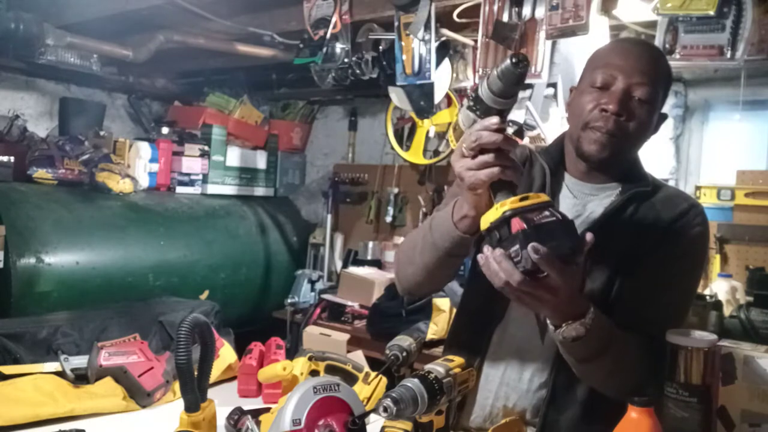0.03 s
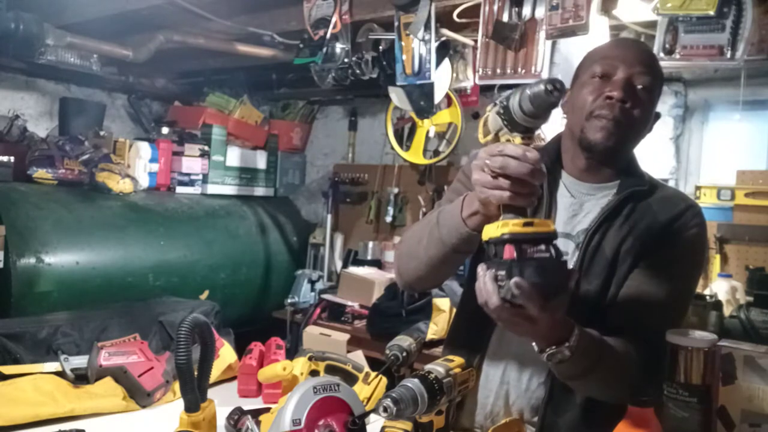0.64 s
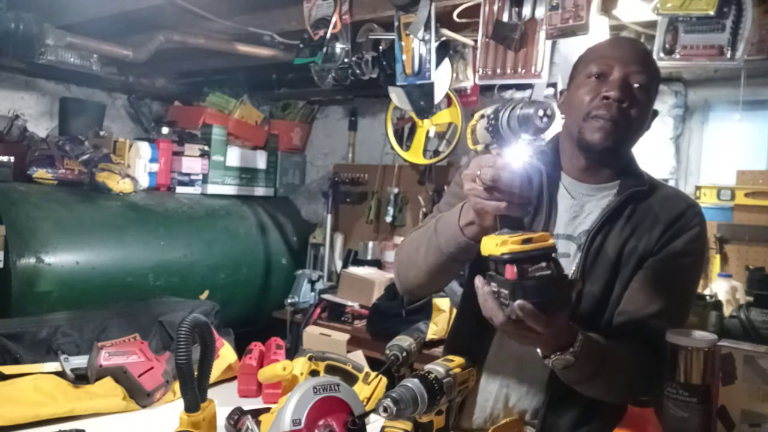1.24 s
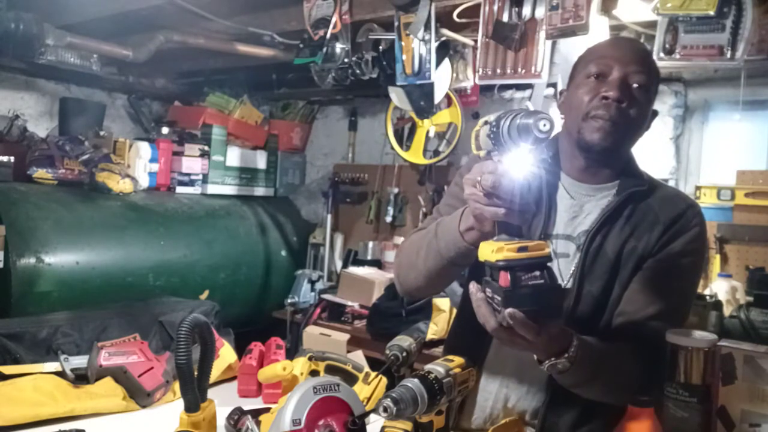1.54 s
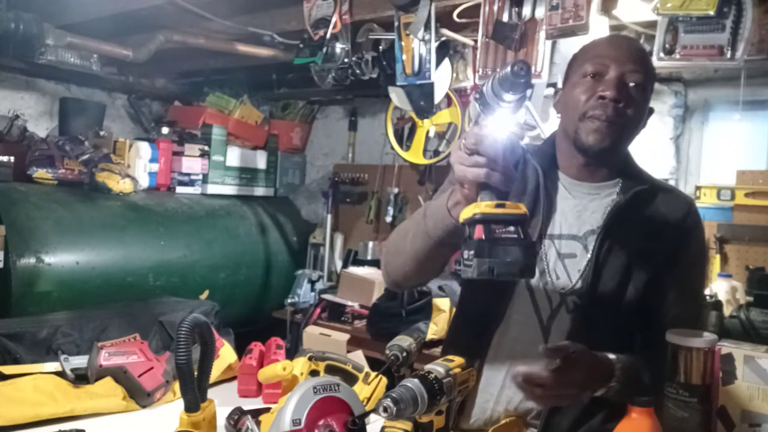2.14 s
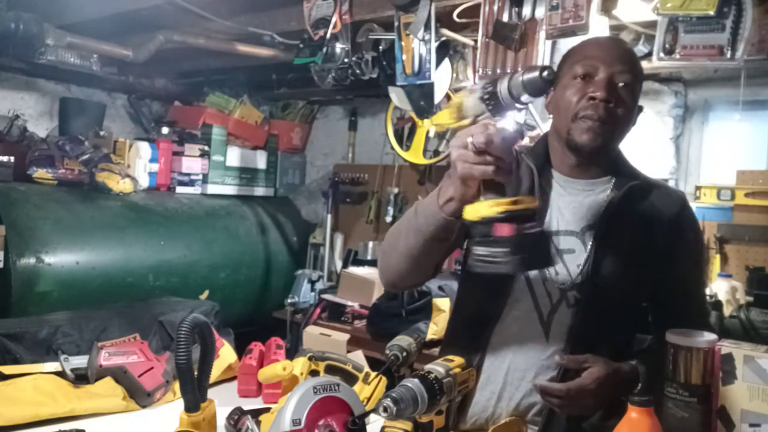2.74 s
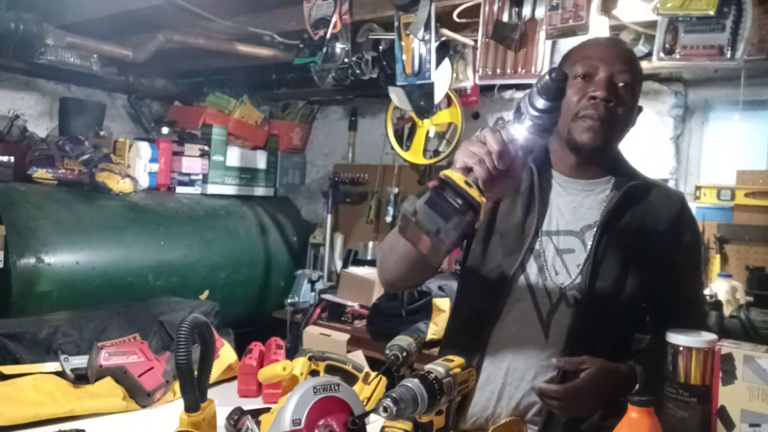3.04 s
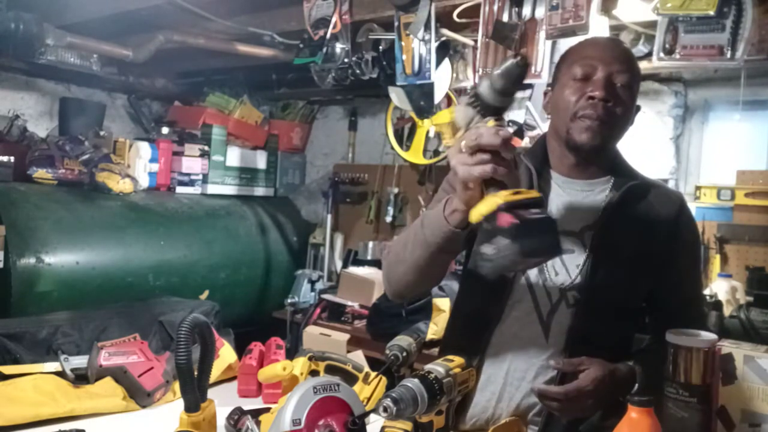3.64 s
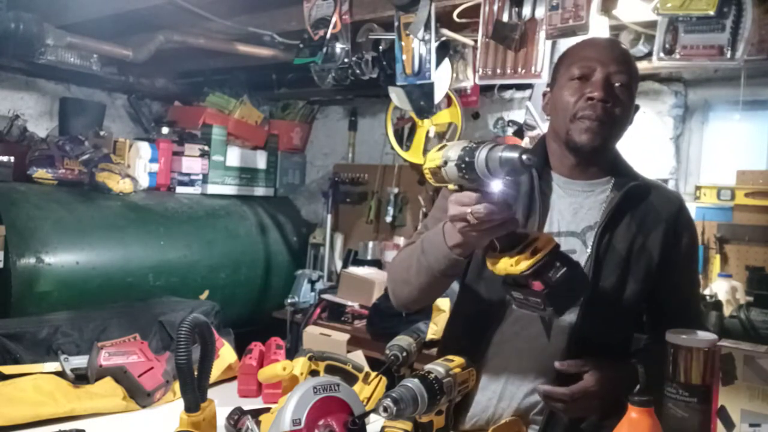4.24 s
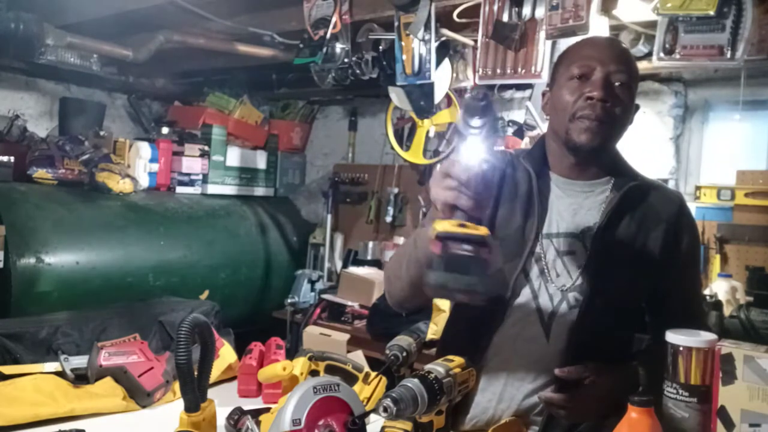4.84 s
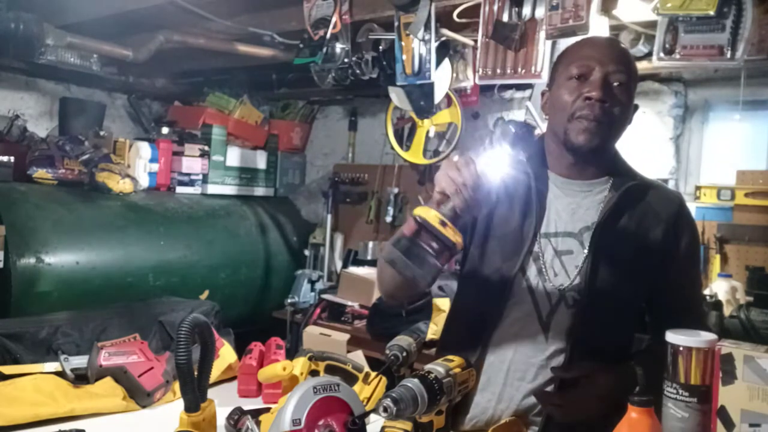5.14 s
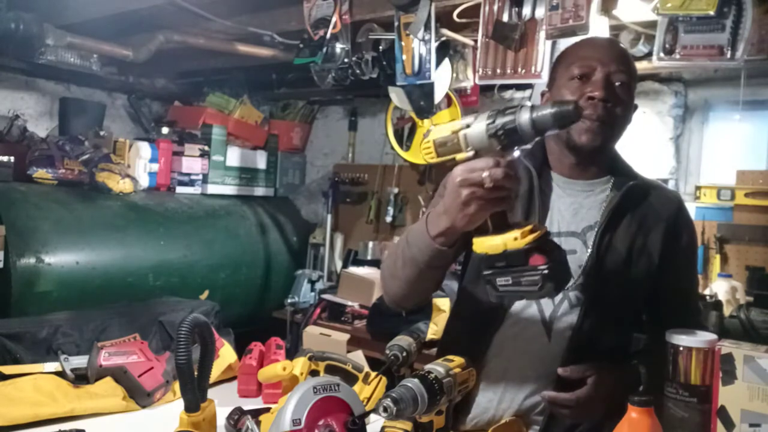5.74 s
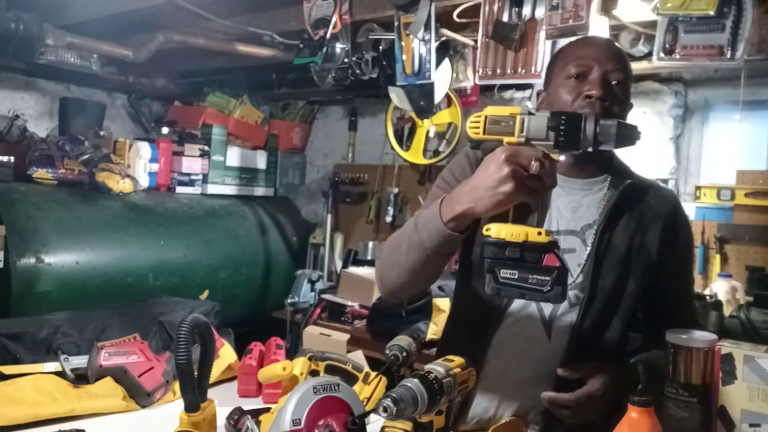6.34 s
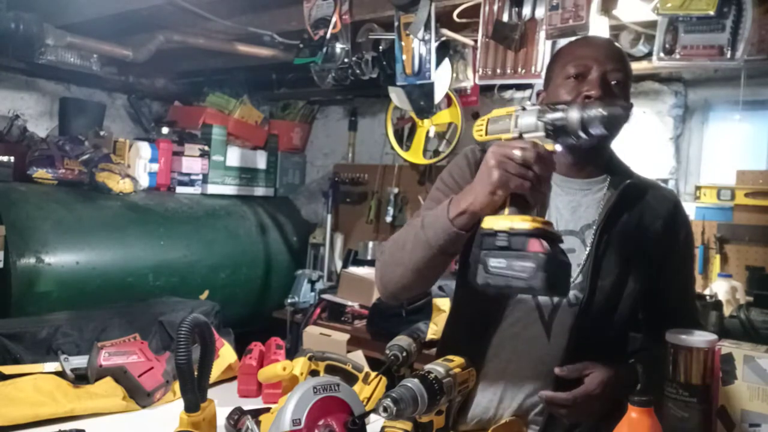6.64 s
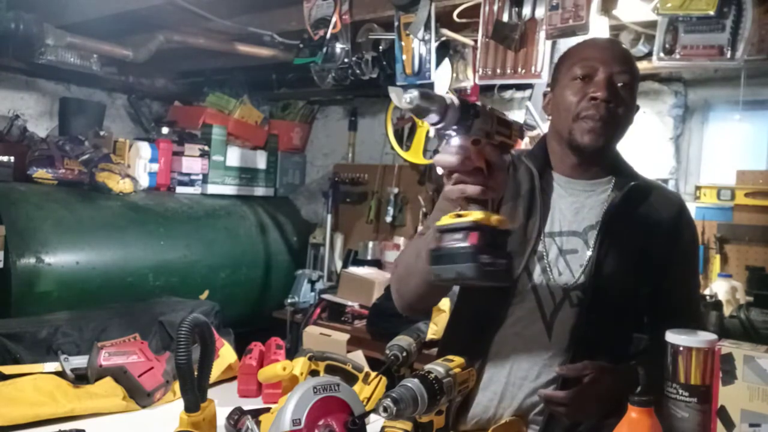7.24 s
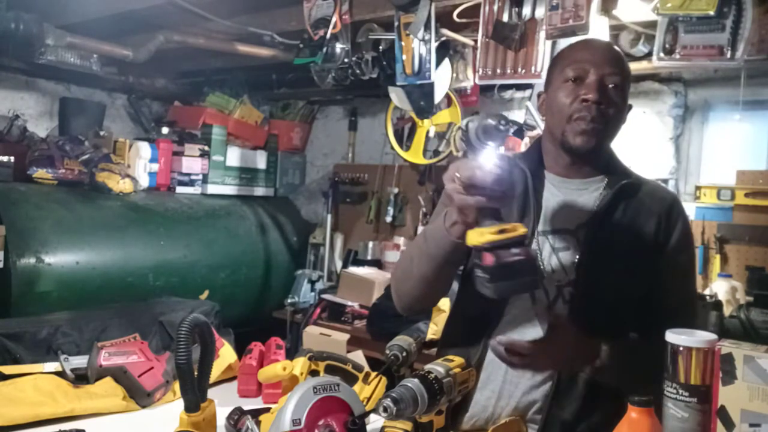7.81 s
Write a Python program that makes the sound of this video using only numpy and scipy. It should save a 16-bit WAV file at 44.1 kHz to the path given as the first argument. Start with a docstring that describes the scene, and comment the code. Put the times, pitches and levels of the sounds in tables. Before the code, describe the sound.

A cordless drill whines with no load in one short blip and two longer runs, clacking at each start and stop.

```python
"""A cordless drill runs without load in a small, cluttered workshop, two metres away. Over still air and
a faint rumble, chuck lock and switches clack and a hand slides on the grip. At one second the trigger is
blipped: the motor whines on multiples of its shaft speed and gear teeth rattle in the housing. Two long
runs follow, the whine swelling and fading as the drill is turned. The chuck clacks whenever it takes up
its play or is braked. The last run is let down slowly and stops with a clack at eight seconds."""
import sys
import numpy as np
from scipy import signal
from scipy.fft import rfft, irfft
from scipy.io import wavfile
from scipy.ndimage import uniform_filter1d

SR = 44100
rng = np.random.default_rng(int(sys.argv[2]) if len(sys.argv) > 2 else 0)


def bounce(signal):
    """Save signal as a 16-bit WAV file at the path given by the first command-line argument."""
    frames = np.transpose(np.atleast_2d(signal))
    limited = np.clip(frames, -1, 1)
    pcm = np.round(limited * 32767).astype(np.int16)
    wavfile.write(sys.argv[1], SR, pcm)


N = 356019
FULL_HZ = 360  # shaft turns per second at full speed


def undb(db):
    """Decibels to gain."""
    return 10 ** (np.asarray(db) / 20)


def unit(x):
    """Scale to rms 1."""
    return x / np.sqrt(np.mean(x ** 2))


def curve(table):
    """Join (seconds, value) points with straight lines."""
    seconds, values = np.transpose(table)
    return np.interp(np.arange(N) / SR, seconds, values)


def walk(rate):
    """Smooth random drift that changes about rate times a second; rms 1."""
    hold = max(int(SR / rate), 2)
    steps = np.repeat(rng.standard_normal(N // hold + 1), hold)
    return unit(uniform_filter1d(steps, hold)[:N])


def through(x, response):
    """Pass a sound through an impulse response."""
    return signal.fftconvolve(x, response)[:N]


def body(points, modes=(), size=2048):
    """Causal response of unit energy from a (Hz, dB) outline with resonances on top."""
    f = np.maximum(np.fft.rfftfreq(size, 1 / SR), 1)
    hz, db = np.transpose(points)
    outline = undb(np.interp(np.log(f), np.log(hz), db))
    peaks = sum(undb(d) / (1 + (2 * (f - centre) / width) ** 2) for centre, width, d in modes)
    cepstrum = irfft(np.log(outline * (1 + peaks)))
    cepstrum[1:size // 2] *= 2  # fold to minimum phase
    cepstrum[size // 2 + 1:] = 0
    response = irfft(np.exp(rfft(cepstrum)))
    return response / np.sqrt(np.sum(response ** 2))


def partials(turns, orders, flutter_db):
    """Tones locked to the shaft angle, each fluttering on its own."""
    return sum(np.sqrt(2) * undb(db + flutter_db * walk(35))
               * np.sin(2 * np.pi * (order * turns + rng.random())) for order, db in orders)


# Tone colours of the still air and the building's rumble. Each row: frequency in Hz, relative level in dB.
AIR_COLOUR = [(25, -17), (65, -10), (130, -1), (300, -8), (650, -6), (1100, -16.5), (1650, -11),
              (3000, -19.5), (6800, -16.5), (7800, -30.5), (10000, -18), (15500, -23)]
RUMBLE_COLOUR = [(25, -14.5), (45, -9), (65, 3), (90, -11), (200, -28.5), (600, -62)]
# The rumble's fader ride. Each row: time in seconds, level in dB.
RUMBLE_LEVEL = [(0, -75), (1.1, -75.5), (1.7, -91), (2.8, -91), (4.1, -73), (4.8, -89), (5.8, -92),
                (6.4, -72), (7.2, -65), (8, -74)]

def room_tone(air_db=-71, air_swell_db=2.0, rumble_swell_db=3):
    """A bed of quiet air, with a faint rumble in the building that comes and goes."""
    rumble_db = curve(RUMBLE_LEVEL) + rumble_swell_db * walk(3.7)
    air = undb(air_db + air_swell_db * walk(2.8)) * through(rng.standard_normal(N), body(AIR_COLOUR))
    return air + undb(rumble_db) * through(rng.standard_normal(N), body(RUMBLE_COLOUR, size=8192))


# Hits of chuck lock, trigger and switches. Each row: start in seconds, relative level in dB,
# low knock and bright edge in dB against that level, chatter decay in seconds.
CLACKS = [(0.001, -32, -5, -11, 0.016), (0.016, -29, 11.5, -8, 0.0032), (0.045, -34.5, -26, -8, 0.016),
          (0.079, -25, -0.5, -13, 0.0043), (0.127, -47, 3, -4, 0.0032), (0.3154, -28, -4, -14, 0.0025),
          (0.324, -31, -4, -8, 0.0048), (0.3335, -6.5, -14, -4, 0.0022), (0.341, -20, -8.5, -12, 0.01),
          (0.467, -50, 0, -14, 0.0039), (0.554, -47, -16, -10, .003), (0.575, -58.5, 13.5, -13, 0.0059),
          (0.963, -34, -3.5, -2, 0.014), (0.981, -10, -19, -5, 0.0045), (1.017, -13, -13.5, -2.5, 0.0083),
          (1.17, -9, -24.5, -2.5, 0.0044), (1.189, -16, -21, -6, 0.013), (1.343, -25.5, -4.5, -2.5, 0.0066),
          (1.368, -16, -22, 0.5, 0.0047), (1.385, -12, -17, -3, 0.0054), (3.741, -19.5, -9, 6.5, 0.0031),
          (3.759, -32, 1.5, 10, 0.013), (3.8, -41, -14, -8, .004), (3.892, -46, -29, -2, 0.0059),
          (4.000, -55, -4, -2.5, 0.0038), (4.063, -23.5, -9, -6, .004), (4.088, -12.5, -21.5, -3.5, 0.0063),
          (4.116, -21, -7.5, -4, 0.021), (7.980, -14, -15, -6, 0.005), (7.990, -31, 1.5, -15, 0.027)]
# The three layers of a hit. Each row: frequency in Hz, relative level in dB.
KNOCK_COLOUR = [(100, -31.5), (200, -23.5), (280, -6.5), (450, -6.5), (640, 2), (850, 0.5), (1100, 0),
                (1800, 5), (5000, -46.5)]
CLACK_COLOUR = [(300, -38.5), (900, -13.5), (1550, -7.5), (2200, -3), (3300, 1), (4100, -1), (5000, 0),
                (7000, 2.5), (8000, -12), (15000, -29)]
EDGE_COLOUR = [(3000, -47), (7000, -16), (8500, 1), (10000, -4.5), (12000, -6), (16000, -6.5)]
# Ring of the plastic shell and battery. Each row: frequency in Hz, width in Hz, strength in dB.
SHELL_MODES = [(463, 25, 8), (628, 25, 6.5), (875, 50, 3), (1080, 35, 2.5)]

def clacks(gain_db=2):
    """Each hit is a burst of chatter that sounds the plastic shell, the steel chuck and its edges."""
    t = np.arange(N) / SR
    forces = np.zeros((3, N))
    for start_s, db, knock_db, edge_db, decay_s in CLACKS:
        start = int(start_s * SR)
        span = min(SR // 4, N - start)
        gains = undb(db + np.array([[knock_db], [0], [edge_db]]))
        forces[:, start:start + span] += gains * np.exp(-t[:span] / decay_s)
    voices = body(KNOCK_COLOUR, SHELL_MODES), body(CLACK_COLOUR), body(EDGE_COLOUR)
    layers = (through(force * rng.standard_normal(N), voice) for force, voice in zip(forces, voices))
    return undb(gain_db) * sum(layers)


def workshop(dry, t60_low=0.16, t60_high=0.15, wet_db=0, changes=130):
    """Direct sound plus scatter from shelves and a low ceiling, shifting as the drill is waved about."""
    t = np.arange(SR // 3) / SR
    hop = N // changes + 1
    fade = np.sin(np.pi * (np.arange(2 * hop) + .5) / (2 * hop))
    padded = np.pad(dry, (hop, 3 * hop))
    wet = np.zeros(len(padded) + len(t))
    low, high = (signal.butter(2, 7000, kind, fs=SR, output="sos") for kind in ("low", "high"))
    for start in range(0, N + hop, hop):
        tail = sum(signal.sosfilt(sos, rng.standard_normal(len(t))) * np.exp(-np.log(1000) * t / t60)
                   for sos, t60 in ((low, t60_low), (high, t60_high)))
        tail /= np.sqrt(np.sum(tail ** 2))
        scatter = signal.fftconvolve(padded[start:start + 2 * hop] * fade, tail)
        wet[start:start + len(scatter)] += scatter
    return (dry + undb(wet_db) * wet[hop:hop + N]) / np.hypot(1, undb(wet_db))


# Hand and sleeve moves on the grip. Each row: middle in seconds, half length in seconds, level in dB.
RUBS = [(0.532, .035, -59), (0.626, 0.042, -52), (0.827, 0.027, -64), (0.93, 0.018, -67)]
# Tone colour of the rubbing. Each row: frequency in Hz, relative level in dB.
RUB_COLOUR = [(200, -13), (700, 0), (1100, -10), (1900, 6), (3800, 0), (6800, 6), (8200, 0), (15500, -1)]

def grip(grain_db=3):
    """Skin and cloth slide over the handle in small uneven slips."""
    t = np.arange(N) / SR
    slide = sum(undb(db) * np.exp(-((t - middle) / half) ** 2) for middle, half, db in RUBS)
    slips = unit(rng.standard_normal(N) * undb(grain_db * walk(220)))
    return through(slips * slide, body(RUB_COLOUR))


# Trigger cues. Each row: when the motor starts, the gears engage and the brake bites, then spin-up time
# and braking time, all in seconds, and last the relative force on the gears in dB.
PULLS = [(0.966, 1.013, 1.169, 0.089, .05, -20.5), (1.340, 1.379, 3.740, 0.1, .075, -20.1),
         (4.054, 4.085, 7.980, .255, .075, -20)]
# Shaft speed the finger asks for in each pull. Each row: time in seconds, turns per second.
BLIP_SPEED = [(1.05, 215), (1.15, 258)]
FIRST_RUN_SPEED = [(1.5, 347), (1.64, 358.5), (1.8, 362.7), (2.06, 362.5), (2.29, 338.5), (2.46, 358),
                   (2.88, 362), (3.08, 341.5), (3.5, 331)]
LAST_RUN_SPEED = [(4.4, 363), (5.3, 359.2), (5.8, 359.7), (6.05, 337.5), (6.35, 330.8), (6.83, 330.2),
                  (6.95, 341), (7.28, 272), (7.5, 248.5), (7.95, 163)]

def motor(knee=5, coast_s=0.022, coast_db=-15):
    """Each pull spins the shaft up and the brake stops it; returns speed and the force on the gears."""
    t = np.arange(N) / SR
    hz, load = np.zeros(N), np.zeros(N)
    speeds = BLIP_SPEED, FIRST_RUN_SPEED, LAST_RUN_SPEED
    for (start, engage, brake, rise_s, brake_s, db), asked in zip(PULLS, speeds):
        ramp = np.clip((t - start) / rise_s, 0, 20)
        spin_up = ramp / (1 + ramp ** knee) ** (1 / knee)
        braking = np.clip(1 - (t - brake) / brake_s, 0, 1)
        hz += curve(asked) * spin_up * braking
        coasting = (t > brake - coast_s) & (t < brake)  # unloaded between letting go and the brake
        load += undb(db + coast_db * coasting) * (t > engage) * (braking > 0)
    return hz, uniform_filter1d(load, size=200)


# Tone colour of the kick in the hand. Each row: frequency in Hz, relative level in dB.
KICK_COLOUR = [(25, -7), (65, 3), (120, -1), (220, -5), (500, -23), (2000, -59)]

def kick(hz, level_db=-63.5):
    """The drill kicks in the hand with a dull thud as the shaft is sped up or braked."""
    acceleration = np.abs(np.gradient(hz)) * SR / FULL_HZ / 10  # 1 is rest to full speed in 0.1 s
    torque = uniform_filter1d(acceleration, size=3000)
    return undb(level_db) * torque * through(rng.standard_normal(N), body(KICK_COLOUR, size=4096))


# Swells of the main whine as its beam swings past. Each row: time in seconds, relative level in dB.
FIRST_RUN_WHINE = [(1.64, -30.5), (1.8, -20.5), (2, -17), (2.16, -25.5), (2.23, -21.5), (2.37, -25.5),
                   (2.52, -16), (2.7, -30.5), (2.98, -23), (3.16, -29), (3.3, -20.5), (3.52, -29.5)]
LAST_RUN_WHINE = [(4.24, -32), (4.35, -24.5), (4.48, -17), (4.78, -23), (5.13, -26), (5.28, -18.5),
                  (5.5, -30), (5.6, -19), (5.8, -25), (6.24, -24), (6.5, -36), (6.86, -34.5), (6.95, -25),
                  (7.1, -34)]
# Three families of weaker tones. Each row: multiple of the shaft speed, relative level in dB.
LOW_ORDERS = [(3, -58), (5, -64), (7, -35.5)]
UPPER_ORDERS = [(21, -36.5), (28, -47), (42, -53)]
GEAR_ORDERS = [(17, -36.5), (19, -50), (34, -50)]
# Each family beams in its own direction. Each row: time in seconds, gain in dB.
LOW_BEAM = [(1.62, 2.5), (1.8, -14), (2.15, 4), (2.6, 3.5), (2.9, -2.5), (4.35, -3), (4.55, 5), (5.05, 1.5),
            (5.65, -5), (6.6, 4), (6.85, -6), (7.25, 2.5), (7.8, 1.5)]
UPPER_BEAM = [(1.5, 6.5), (2.05, -10), (2.27, 5), (2.7, -13), (3.3, 12), (3.7, 4), (4.3, 0), (4.5, 10),
              (4.75, -5), (5.5, 4.5), (6.4, 8.5), (6.62, 18), (6.85, 1), (7.2, 4), (7.5, 10.5)]
GEAR_BEAM = [(1.5, -12), (1.85, 11.5), (2.25, 1), (2.48, 6), (2.8, -11), (3.1, 6), (4.3, -3), (4.55, 7),
             (5, -3), (6.5, -2), (7.17, 6), (7.4, 3)]

def whine(angle, octaves, main_order=14, db_per_octave=8):
    """Motor and gear tones grow with speed; they beam, so they swell and fade as the drill is turned."""
    main_beam = undb(curve(FIRST_RUN_WHINE + LAST_RUN_WHINE))
    main = main_beam * partials(angle, [(main_order, 0)], flutter_db=2.0)
    families = (LOW_BEAM, LOW_ORDERS), (UPPER_BEAM, UPPER_ORDERS), (GEAR_BEAM, GEAR_ORDERS)
    others = sum(undb(curve(beam)) * partials(angle, orders, flutter_db=1.76)
                 for beam, orders in families)
    return undb(db_per_octave * octaves) * (main + others)


# The rotor hum's fader ride. Each row: time in seconds, relative level in dB.
HUM_LEVEL = [(1.6, -63), (1.85, -57.5), (2.35, -55), (2.55, -79), (2.9, -69), (3.25, -54), (4.95, -56.5),
             (5.24, -83), (5.47, -62), (5.85, -67), (6.2, -55.5), (7.1, -56.5), (7.4, -64)]

def rotor_hum(angle, octaves, db_per_octave=22):
    """The rotor's unbalance hums at the shaft speed and falls away steeply as it slows."""
    level = undb(curve(HUM_LEVEL) + db_per_octave * octaves)
    return level * partials(angle, [(1, 0.0064)], flutter_db=2.3)


# Tone colour radiated by the gearbox and its shell. Each row: frequency in Hz, relative level in dB.
HOUSING_COLOUR = [(120, -59), (250, -42.5), (420, -21.5), (560, -19), (730, -11), (1050, -10), (1550, -3.5),
                  (2250, -0.5), (3300, -2), (5200, 1.5), (7200, 0.5), (7800, -6.5), (11500, -9.5),
                  (15500, -8.5)]
# Ring of the metal gear case. Each row: frequency in Hz, width in Hz, strength in dB.
CASE_MODES = [(1643, 70, -6), (2837, 230, -0.5), (6240, 200, -13), (9850, 1000, 6.5)]

def gear_rattle(turns, hz, scatter_db=5.5, hiss_db=-5, wobble_db=2, slow_hz=230, unrest_db=1.0,
                wear_share=.3, teeth_per_turn=14, teeth_per_chuck_turn=147):
    """Loose teeth strike the case with uneven force and timing; brushes and fan add a hiss."""
    teeth = np.arange(int(turns[-1] * teeth_per_turn))
    # part of the unevenness is wear, which comes round again with each turn of the chuck
    wear = rng.standard_normal((teeth_per_chuck_turn, 3))[teeth % teeth_per_chuck_turn]
    chance = rng.standard_normal((len(teeth), 3))
    timing, side, strength = (np.sqrt(wear_share) * wear + np.sqrt(1 - wear_share) * chance).T
    at = np.searchsorted(turns, (teeth + .3 * timing) / teeth_per_turn).clip(0, N - 1)
    strikes = np.bincount(at, np.sign(side) * undb(scatter_db * np.minimum(strength, 2)), N)
    strikes = unit(strikes / np.sqrt(np.maximum(hz, 100)))
    force = unit(strikes + undb(hiss_db) * rng.standard_normal(N))
    # the planet carrier turns once in about five shaft turns and loads the teeth unevenly, most when slow
    carrier = np.sin(2 * np.pi * (turns / 4.7 + 0.17 * walk(25)))
    depth = np.minimum(slow_hz / np.maximum(hz, 1), 1) ** 2
    force *= undb(wobble_db * depth * carrier + unrest_db * walk(45))
    return through(force, body(HOUSING_COLOUR, CASE_MODES))


def brighten(rattle, octaves, treble_db=1.36, db_per_octave=2.5):
    """A treble shelf that opens up the rattle as the speed rises."""
    treble = signal.sosfilt(signal.butter(1, 7500, "high", fs=SR, output="sos"), rattle)
    return rattle + (undb(treble_db + db_per_octave * octaves) - 1) * treble


# The buzz inside the rattle. Each row: multiple of the shaft speed, relative level in dB.
BUZZ_ORDERS = [(2, -37), (4, -27.5), (5, -28), (15, -18), (18, -31), (20, -30), (22, -35), (27, -20),
               (35, -34)]

def buzz(angle, pace):
    """A stack of shaft harmonics, strongest at full speed."""
    return pace ** 2 * partials(angle, BUZZ_ORDERS, flutter_db=1.0)


# The low-speed growl of the gears. Each row: multiple of the shaft speed, relative level in dB.
GROWL_ORDERS = [(3, -25.5), (7, -15.5), (14, -4), (28, -4)]

def growl(angle, pace, slack):
    """Slack gears growl when the motor is throttled back and fall silent at full speed."""
    return slack * pace * partials(angle, GROWL_ORDERS, flutter_db=0.5)


def drill(hz, load, rattle_db_per_octave=4, backlash_db=2, slack_turns=0.022, shake_db=3,
          chuck_ratio=10.5, throb_db=1.0):
    """One shaft drives every running layer; returns the sound the room scatters and the direct tones."""
    pace = np.clip(hz / FULL_HZ, .01, 1)
    octaves, slack = np.log2(pace), 1 - pace ** 2
    turns = np.cumsum(np.maximum(hz, 1) * (1 + .001 * walk(40) + .002 * walk(400))) / SR
    force = load * undb(rattle_db_per_octave * octaves + backlash_db * slack)
    rattle = brighten(gear_rattle(turns, hz), octaves)
    # below full speed the gears float in their backlash and the tones turn raspy
    angle = turns + slack_turns * slack ** 2 * walk(250)
    shake = undb(shake_db * slack * walk(150))
    buzzing = force * buzz(angle, pace)
    gear_noise = force * (rattle + shake * growl(angle, pace, slack))
    # the load varies a little with each turn of the chuck
    throb = undb(throb_db * np.sin(2 * np.pi * turns / chuck_ratio))
    tones = (whine(angle, octaves) + rotor_hum(angle, octaves)) * shake * throb * load / load.max()
    return gear_noise, tones + buzzing


def scene():
    """Drill and hand in the room; both channels are alike."""
    hz, load = motor()
    gear_noise, tones = drill(hz, load)
    mono = workshop(gear_noise + clacks() + grip()) + tones + room_tone() + kick(hz)
    return np.array([mono, mono])


def record(dry):
    """Soft saturation rounds the highest peaks and a steep low-pass cuts the top."""
    low_pass = signal.ellip(10, .2, 70, 15750, fs=SR, output="sos")
    return signal.sosfilt(low_pass, np.tanh(0.85 * dry) / 0.86)


dry = scene()
out = record(dry)
bounce(out)
```